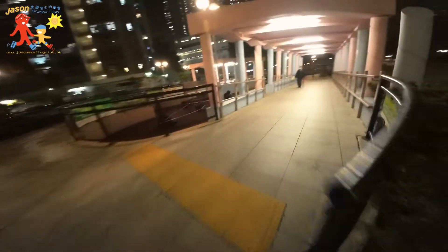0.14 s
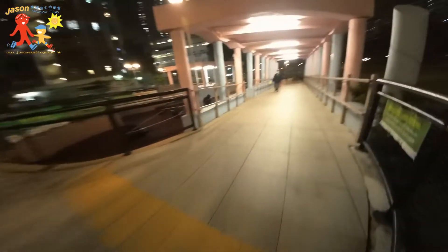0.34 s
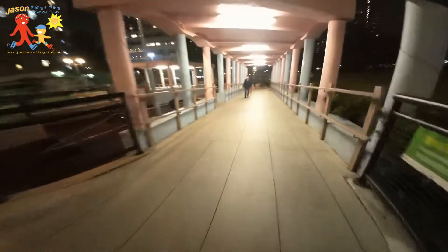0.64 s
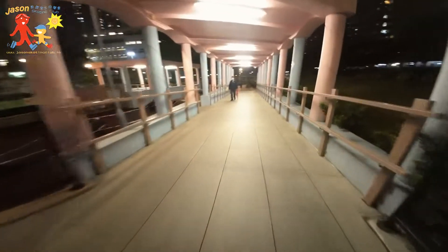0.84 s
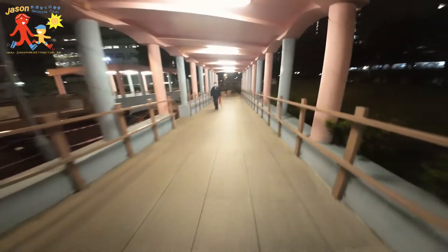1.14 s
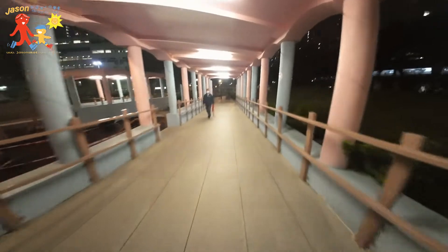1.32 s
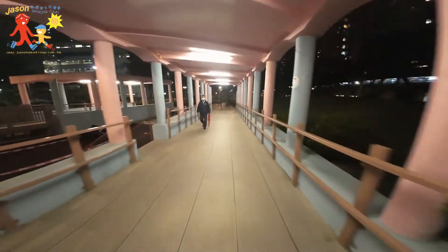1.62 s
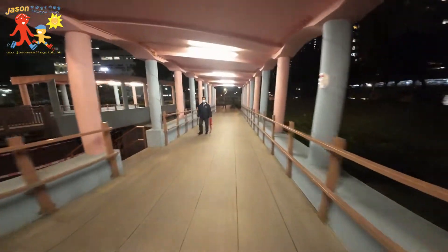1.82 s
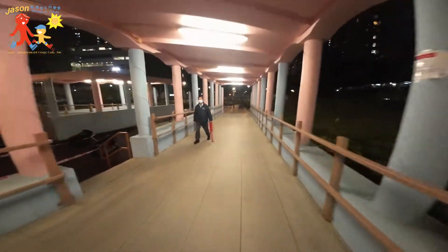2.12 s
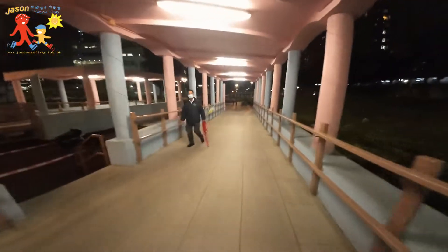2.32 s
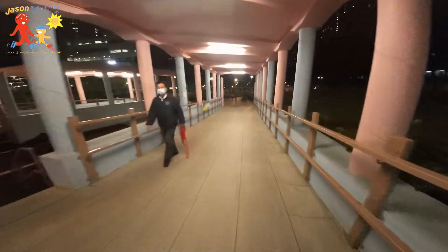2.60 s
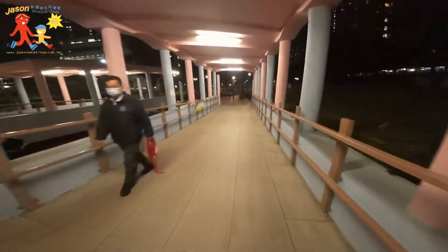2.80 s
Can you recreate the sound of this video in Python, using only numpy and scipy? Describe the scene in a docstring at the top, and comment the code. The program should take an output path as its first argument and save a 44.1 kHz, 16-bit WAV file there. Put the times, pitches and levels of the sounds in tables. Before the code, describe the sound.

Skates rumble over paving, heard from the skater's own wind-buffeted microphone. A quick burst of knocks and scraping echoes slightly under the walkway roof, a thin hiss fades, and the rolling continues with faint clicks and rustling.

```python
"""Skates roll along a paved, covered walkway, heard from a microphone that the skater carries.
The wheels rumble on the grit, clatter over a rough threshold and shudder; a fine hiss,
like a bearing running free, dies away. Wind buffets the microphone, and the skater's gear
ticks and rustles. The sharp sounds echo briefly off the roof, pillars and paving."""
import sys
import numpy as np
from scipy import signal
from scipy.fft import rfft, irfft
from scipy.io import wavfile
from scipy.ndimage import uniform_filter1d

SR = 44100
rng = np.random.default_rng(int(sys.argv[2]) if len(sys.argv) > 2 else 0)


def transcribe(signal):
    """Save signal, clipped to [-1, 1], as a 16-bit WAV file at the path in sys.argv[1]."""
    frames = np.atleast_2d(signal).T
    limited = np.clip(frames, -1, 1)
    pcm = np.round(limited * 32767).astype(np.int16)
    wavfile.write(sys.argv[1], SR, pcm)


N = 130095
TIME = np.arange(N) / SR

# Tone of the wheels' rumble and the treads' hiss. Each row: frequency in Hz, strength in dB.
RUMBLE_TONE = [(90, -30), (150, -4), (185, -1), (230, -6.5), (300, -5.5), (380, -6), (440, -8), (540, -6.5),
               (780, -8), (930, -10), (1100, -15.5), (1550, -19), (1950, -22), (2350, -21.5), (2800, -30.5),
               (3600, -32.5), (4700, -39.5), (6200, -38), (9000, -75), (12000, -69)]
TREAD_TONE = [(1500, -34), (3300, 5), (5000, -0.5), (7000, -2.5), (9900, -2.5), (12000, -5.5), (15000, -12)]
# Where the wheel hubs ring. Each row: frequency in Hz, width in Hz, strength in dB.
HUB_RINGS = [(1165, 660, 7.5), (1915, 480, 3.5), (2140, 280, -8.5), (2960, 1330, -9)]
# How each rolling sound swells and fades. Each row: time in seconds, relative level in dB.
RUMBLE_LEVEL = [(0, -39), (.2, -38.5), (.57, -36.5), (.87, -35), (.98, -38.5), (1.25, -38), (1.6, -39),
                (2.2, -38.5), (2.95, -38.5)]
TREAD_LEVEL = [(0, -61.5), (.55, -63), (1.2, -62), (1.7, -60.5), (1.95, -59.5), (2.55, -60.5),
               (2.95, -56.5)]
WHIRR_LEVEL = [(0, -52), (.5, -53.5), (.8, -51.5), (1.1, -49), (1.6, -49), (2.0, -48.5), (2.3, -49),
               (2.45, -47), (2.6, -49), (2.73, -49.5), (2.84, -47.5), (2.95, -47)]
DRONE_LEVEL = [(0, -41), (.3, -50.5), (.55, -40), (.8, -39), (1.05, -35.5), (1.35, -37), (1.6, -50),
               (1.95, -41.5), (2.3, -41.5), (2.52, -36.5), (2.7, -44), (2.95, -44.5)]
# Bumps in the paving. Each row: time of the peak in seconds, level in dB, pitch in Hz.
BUMPS = [(.335, -32.5, 140), (2.295, -29, 123), (2.405, -32, 145), (2.465, -32, 126), (2.538, -34, 131),
         (2.69, -33, 157)]

def rolling():
    """Grainy paving shakes the wheels; the treads hiss, the hubs whirr, a wheel drones, and the paving bumps."""
    flutter = amp(0.5 * noise(lambda f: bell(f, centre=0, width=60)))  # wavers by about half a dB
    grains = colour(grit(per_s=14000, spread_db=0.32), RUMBLE_TONE)
    rumble = steadied(grains, span_s=0.098) * level(RUMBLE_LEVEL) * amp(-2)
    tread = colour(rng.standard_normal(N), TREAD_TONE) * level(TREAD_LEVEL)
    hubs = noise(lambda f: sum(amp(db) * bell(f, hz, width) for hz, width, db in HUB_RINGS))
    whirr = hubs * level(WHIRR_LEVEL)
    hum = noise(lambda f: bell(f, centre=131.2, width=12.8))
    drone = steadied(hum, span_s=0.16) * level(DRONE_LEVEL)
    return (rumble + tread + whirr) * flutter + drone + swells(BUMPS, half_s=0.011)


# Wheels hitting edges. Each row: start in seconds, relative crack and grind levels in dB,
# seconds for the grind to fade by 60 dB, treble limit in Hz, thud level in dB.
KNOCKS = [(.604, -7, -33, 0.023, 3600, -34), (.610, -17, -33.5, 0.05, 13000, -24.5),
          (.619, -15, -45, .03, 3500, -25.5), (.630, -21, -47, .03, 2300, -36),
          (0.682, -28, -45, .035, 7000, -33), (.700, -10, -33, .03, 2400, -34.5),
          (.741, -16, -35, .04, 5000, -31), (.751, -14, -42, .03, 4500, -44),
          (.772, -16, -24.5, 0.057, 4460, -36), (.780, -9, -25, 0.04, 14000, -30.5),
          (.786, -11, -30, 0.028, 12000, -26.5), (.795, -14, -45, 0.019, 3000, -20.5),
          (.806, -8, -42, .02, 2700, -44), (.874, -15.5, -34, .016, 6000, -30),
          (.889, -13, -37, 0.018, 7000, -34), (.902, -12, -29, 0.056, 3200, -29),
          (.911, -10, -38, 0.031, 3000, -47), (.918, -16, -25.5, 0.04, 5000, -36),
          (.924, -10.5, -32, 0.018, 6500, -32), (.936, -26, -34, 0.024, 5000, -50)]
# Tone of the boot and frame. Each row: frequency in Hz, strength in dB.
FRAME_TONE = [(100, -3.5), (190, 7.5), (270, -24), (430, -8), (540, 4.5), (700, -1.5), (920, -16),
              (1150, -25), (1500, -7), (2000, -19), (2400, -10.5), (2800, -14), (3900, -11), (5200, -18.5),
              (6200, -13.5), (8000, -20), (11000, -21.5), (15000, -27)]
# Notes they ring at. Each row: pitch in Hz, relative level in dB, seconds to fade by 60 dB.
FRAME_NOTES = [(352, -11.5, 0.061), (436, -18, 0.072), (512, -15, 0.11), (650, -1, 0.021), (887, -3, 0.039),
               (1865, -6.5, 0.035), (2042, -10, .06), (2336, -7.5, 0.022), (3600, -17.5, 0.028)]

def knocks():
    """Each edge gives a hard crack and a short grind, rings the frame and thuds in the boot."""
    contact, body = np.zeros(N), np.zeros(N)
    t = np.arange(SR // 6) / SR
    for start, crack_db, grind_db, grind_s, top_hz, thud_db in KNOCKS:
        crack = rng.choice([-1, 1], len(t)) * fade(t, seconds=0.009)
        crack *= amp(crack_db) / np.linalg.norm(crack)
        grind = rng.standard_normal(len(t)) * amp(grind_db - 3) * fade(t, grind_s)
        add(contact, start, dulled(crack + grind, top_hz))
        ring = sum(amp(db) * fade(t, ring_s) * np.sin(2 * np.pi * (hz * t + rng.random()))
                   for hz, db, ring_s in FRAME_NOTES)
        attack = np.minimum(t / 0.00081, 1)
        thud_hz = 274 * 2 ** (0.53 * rng.uniform(-1.2, 1))  # a new pitch for every knock
        thud = amp(thud_db) * fade(t, seconds=0.034) * np.sin(2 * np.pi * thud_hz * t)
        add(body, start, amp(crack_db - 19.5) * ring * attack + thud)
    return colour(contact, FRAME_TONE) + body


# Tone of the scrape. Each row: frequency in Hz, strength in dB.
SCRAPE_TONE = [(200, -3), (350, 3.5), (540, 12), (900, 5), (1170, -49), (1500, -4), (2000, 9.5), (2400, -2),
               (2850, -4), (3700, -0.5), (5000, -6.5), (6700, -7), (9000, -9.5), (13000, -15.5),
               (15500, -27)]
# Its loudness. Each row: time in seconds, level in dB.
SCRAPE_LEVEL = [(.6, -74), (.612, -41), (.655, -49), (.69, -40.5), (.73, -40), (.765, -44), (.79, -39.5),
                (.86, -46), (.92, -45), (.95, -45.5), (1.06, -48.5), (1.17, -57), (1.23, -51), (1.35, -59),
                (1.6, -80)]

def scrape():
    """The wheels scrape over the rough threshold in a rattling stream of tiny hits."""
    rattle = amp(noise(lambda f: bell(f, centre=110, width=110)))
    grains = unit(grit(per_s=7600, spread_db=1) * rattle)
    return colour(grains, SCRAPE_TONE) * level(SCRAPE_LEVEL)


# The skate's shaking. Each row: time in seconds, shakes per second, level in dB.
SHUDDER = [(0.701, 70, -56), (0.748, 46.9, -34), (.8, 46.2, -32), (0.841, 53.3, -25), (0.887, 66, -25.5),
           (.92, 61, -16), (0.94, 48, -36)]

def shudder():
    """The skate shakes harder and harder at a changing speed, then settles at once."""
    times, hz, db = np.transpose(SHUDDER)
    t = np.arange(times[0], times[-1], 1 / SR)
    phase = 2 * np.pi * np.cumsum(np.interp(t, times, hz)) / SR
    # Overtones get 20 dB weaker with each octave.
    shake = sum(amp(-20 * np.log2(k)) * np.cos(k * phase) for k in range(1, 6))
    envelope = amp(np.interp(t, times, db)) * signal.windows.tukey(len(t), 0.05)
    out = np.zeros(N)
    add(out, times[0], unit(shake) * envelope)
    return out


# Tone of the bearing. Each row: frequency in Hz, strength in dB.
BEARING_TONE = [(6000, -27), (9000, -14), (9850, 5.5), (10700, -2), (11600, -4), (13000, -3), (14300, -15),
                (15500, -11)]
# Its loudness. Each row: time in seconds, level in dB.
BEARING_LEVEL = [(.65, -68), (.8, -57), (.95, -55), (1.12, -58.5), (1.36, -58), (1.58, -63.5), (1.8, -77)]

def bearing(start_s=0.54):
    """A thin hiss swells and fades, like a free wheel spinning down."""
    return colour(rng.standard_normal(N), BEARING_TONE) * level(BEARING_LEVEL) * (TIME > start_s)


# Tone of the wind. Each row: frequency in Hz, strength in dB.
WIND_TONE = [(10, -36), (24, -4.5), (43, 2), (62, -4.5), (88, -4), (112, -11.5), (170, -19), (260, -24.5),
             (600, -62.5)]
# Its loudness. Each row: time in seconds, level in dB.
WIND_LEVEL = [(0, -39.5), (.08, -32.5), (.21, -39), (.3, -34.5), (.42, -34.5), (.65, -31.5), (.8, -29),
              (.98, -29.5), (1.2, -36.5), (1.5, -35), (1.62, -34), (1.78, -31.5), (1.86, -42), (1.92, -32),
              (2.02, -34), (2.1, -30), (2.22, -30), (2.33, -38), (2.62, -33), (2.95, -35)]
# Single puffs. Each row: time of the peak in seconds, level in dB, pitch in Hz.
PUFFS = [(0.052, -34, 58), (.153, -27, 55), (.256, -23, 50), (.299, -25.5, 26), (.345, -25, 41.8),
         (0.99, -29, 45), (1.563, -25.5, 63), (1.925, -30, 30.3), (2.135, -19.5, 41.4), (2.25, -22.5, 45.7)]

def wind():
    """Swirling air hits the microphone with a low rumble and a few separate puffs."""
    swirl = noise(lambda f: amp(read(WIND_TONE, f)))
    return steadied(swirl, span_s=0.0804) * level(WIND_LEVEL) + swells(PUFFS, half_s=0.0096)


# Light ticks. Each row: start in seconds, level in dB, seconds to fade by 60 dB, treble limit in Hz.
TICKS = [(.105, -42, 0.04, 5500), (.122, -52, .025, 7000), (.150, -40, 0.021, 9500),
         (.199, -50, .015, 4000), (.259, -44, 0.036, 6000), (.273, -37, 0.014, 5500),
         (.298, -37, 0.024, 6030), (1.922, -42.5, 0.086, 6000), (2.118, -49, .07, 8000),
         (2.467, -48, 0.066, 9000), (2.638, -49, 0.032, 8000)]
# Their tone. Each row: frequency in Hz, strength in dB.
TICK_TONE = [(500, -32), (2000, 12.5), (2800, -7), (3450, 6.5), (4600, -4.5), (5500, 0), (7000, -4),
             (9700, -2), (12000, -7), (15000, -13)]

def ticks():
    """Grit and gear tick as they are lightly struck."""
    return colour(blows(TICKS), TICK_TONE)


# Metal clicks. Each row: start in seconds, level in dB.
CLICKS = [(.728, -39), (1.886, -51), (2.017, -45), (2.072, -42), (2.086, -45), (2.098, -49), (2.201, -52),
          (2.240, -46), (2.258, -49), (2.301, -44), (2.403, -49), (2.630, -50), (2.669, -41)]
# Their tone. Each row: frequency in Hz, strength in dB.
CLICK_TONE = [(4000, -6), (8000, -11), (9500, 0), (11000, -1.5), (12500, -9), (15000, -12)]

def clicks(fade_s=0.03):
    """Loose metal parts touch with tiny bright clicks."""
    return colour(blows([(start, db, fade_s, SR / 2) for start, db in CLICKS]), CLICK_TONE)


# Rustles of clothing. Each row: start in seconds, half the length in seconds, level in dB.
RUSTLES = [(0.108, 0.023, -58), (0.145, 0.015, -62), (.26, .012, -61), (0.286, 0.035, -58),
           (1.88, 0.092, -60.5), (2.069, 0.033, -67), (2.108, 0.045, -57), (2.25, 0.08, -62),
           (2.292, 0.042, -70), (2.39, 0.087, -57), (2.464, 0.049, -63), (2.634, .035, -61)]
# Their tone. Each row: frequency in Hz, strength in dB.
RUSTLE_TONE = [(2000, -39), (5000, -4.5), (8200, -5), (9700, -2.5), (11200, -8), (12500, -14), (15000, -20)]

def rustles(rise_s=0.003):
    """Cloth rubs in short bright swishes."""
    envelope = np.zeros(N)
    for start, half_s, db in RUSTLES:
        t = np.arange(0, 2 * half_s, 1 / SR)
        add(envelope, start, np.minimum(t / rise_s, 1) * amp(db - 5.5 * (t / half_s) ** 2))
    return colour(grit(per_s=9000, spread_db=2.5), RUSTLE_TONE) * envelope


# The walkway's echo. Each row: frequency in Hz, seconds to fade by 60 dB.
ECHO_FADE = [(200, 0.15), (2000, 0.17), (12000, 0.36)]

def walkway_echo(x, echoes_per_s=2500):
    """Sound bounces back from the roof, pillars and paving."""
    echoes = rng.standard_normal(SR // 2) * (rng.random(SR // 2) < echoes_per_s / SR)
    echoes[:SR // 160] = 0  # the first bounce takes about 6 ms
    hz, t, bands = signal.stft(echoes, SR, nperseg=256)
    tail = signal.istft(bands * fade(t, read(ECHO_FADE, hz)[:, None]), SR, nperseg=256)[1]
    return signal.fftconvolve(x, tail / np.linalg.norm(tail))[:N]


def grit(per_s, spread_db):
    """Tiny hits at random times, some larger than the rest."""
    size = amp(spread_db * np.minimum(rng.exponential(1, N), 4)) * rng.standard_normal(N)
    return unit(size * (rng.random(N) < per_s / SR))


def blows(table):
    """Each blow is a short, fading burst of noise, softened above its own treble limit."""
    out, t = np.zeros(N), np.arange(SR // 6) / SR
    for start, db, fade_s, top_hz in table:
        burst = rng.standard_normal(len(t)) * amp(db) * fade(t, fade_s)
        add(out, start, dulled(burst, top_hz))
    return out


def swells(table, half_s):
    """Brief low tones, each rising and falling around its peak time."""
    return sum(amp(db) * np.exp(-((TIME - s) / half_s) ** 2) * np.cos(2 * np.pi * hz * (TIME - s))
               for s, db, hz in table)


def noise(gain):
    """Noise of standard strength, its frequencies weighted by gain(Hz)."""
    spectrum = rfft(rng.standard_normal(N)) * gain(np.fft.rfftfreq(N, 1 / SR))
    return unit(irfft(spectrum, N))


def colour(x, tone, size=4096):
    """Gives a sound the tone in a table, with a filter that never rings ahead of a hit."""
    hz = abs(np.fft.fftfreq(size, 1 / SR))
    log_gain = np.log(amp(np.maximum(read(tone, hz), -100)))
    response = np.exp(np.conj(signal.hilbert(log_gain)))
    taps = np.fft.ifft(response).real[:size // 2]
    return signal.fftconvolve(x, taps / np.linalg.norm(taps))[:len(x)]


def dulled(x, top_hz):
    """Softens the treble above top_hz."""
    return signal.lfilter(*signal.butter(2, min(top_hz, SR / 2 - 100), fs=SR), x)


def steadied(x, span_s):
    """Evens out swells slower than the span."""
    return x / np.sqrt(abs(uniform_filter1d(x ** 2, int(span_s * SR))) + 1e-6)


def bell(f, centre, width):
    """A hump that favours frequencies near the centre; all in Hz."""
    return 1 / (1 + (2 * (f - centre) / width) ** 2)


def fade(t, seconds):
    """Falls by 60 dB in the given time."""
    return amp(-60 * t / seconds)


def level(points):
    """Gain over time from rows of seconds and dB."""
    return amp(np.interp(TIME, *np.transpose(points)))


def read(points, hz):
    """Reads between a table's rows, giving each octave equal room."""
    f, value = np.transpose(points)
    return np.interp(np.log(hz + 1), np.log(f + 1), value)


def amp(db):
    """Decibels to gain."""
    return 10 ** (np.asarray(db) / 20)


def unit(x):
    """Scales to a standard strength (rms 1)."""
    return x / np.sqrt(np.mean(x ** 2) + 1e-20)


def add(mix, start_s, sound):
    """Mixes a sound in at its start time."""
    part = mix[max(round(start_s * SR), 0):][:len(sound)]
    part += sound[:len(part)]


def scene():
    """Skates, gear and wind in one channel; only the sharp sounds echo."""
    sharp = knocks() + scrape() + ticks() + rustles() + clicks()
    smooth = rolling() + wind() + shudder() + bearing()
    return (smooth + sharp + amp(-11) * walkway_echo(sharp))[None]


def record(dry):
    """Takes away the highest treble, above 15350 Hz."""
    taps = signal.firwin(511, 15350, window=("kaiser", 9), fs=SR)
    return signal.oaconvolve(dry, taps[None], "same")


dry = scene()
out = record(dry)
transcribe(out)
```